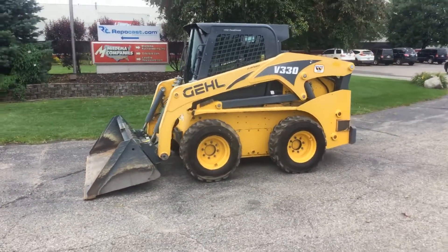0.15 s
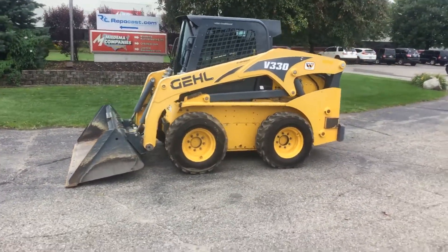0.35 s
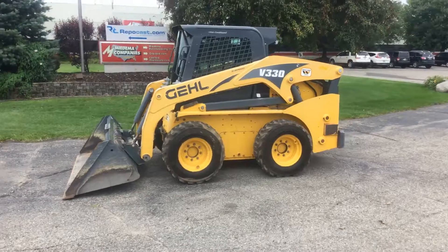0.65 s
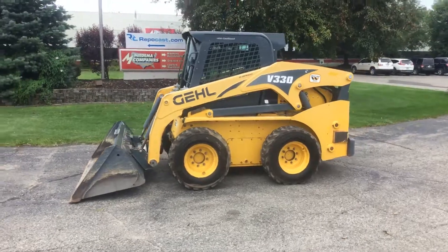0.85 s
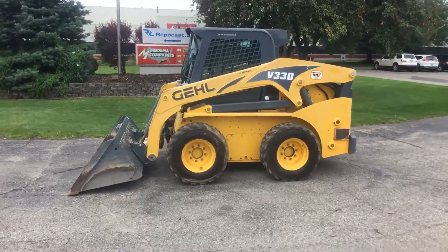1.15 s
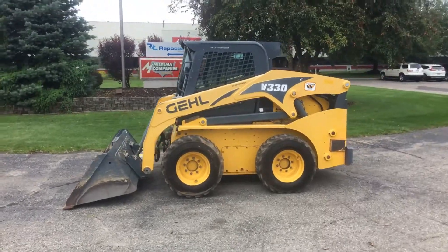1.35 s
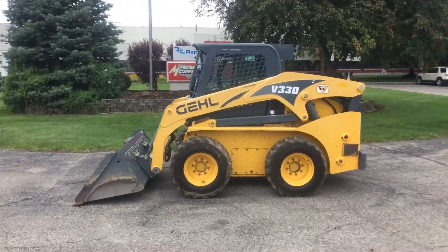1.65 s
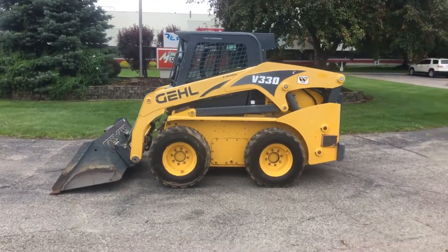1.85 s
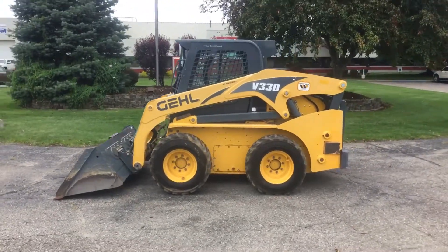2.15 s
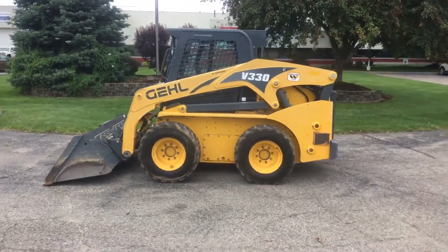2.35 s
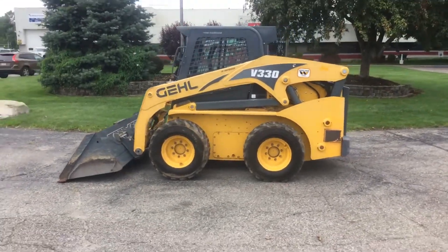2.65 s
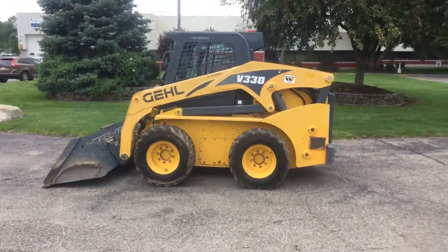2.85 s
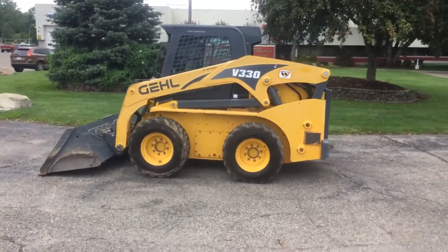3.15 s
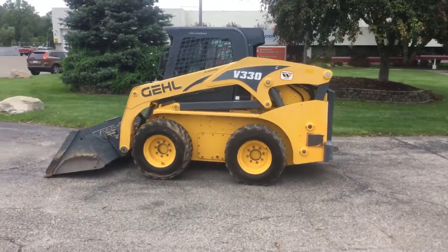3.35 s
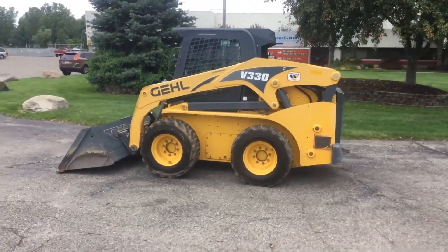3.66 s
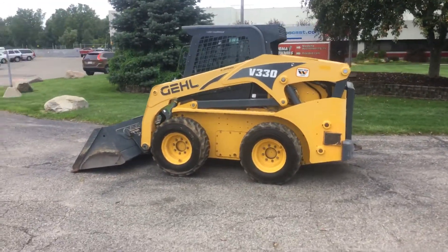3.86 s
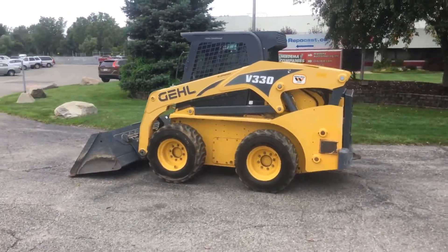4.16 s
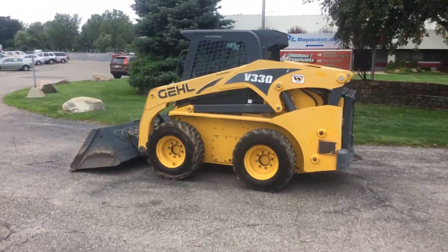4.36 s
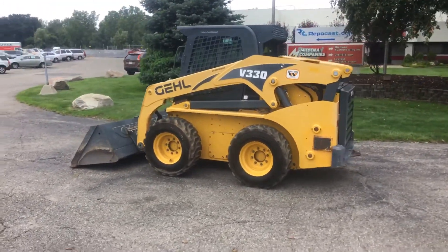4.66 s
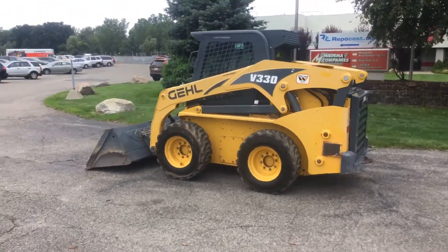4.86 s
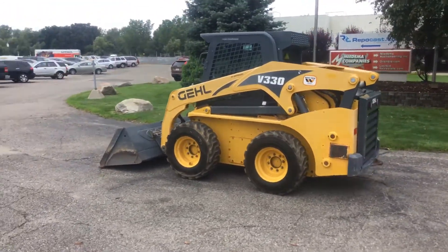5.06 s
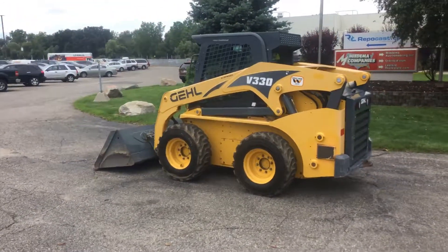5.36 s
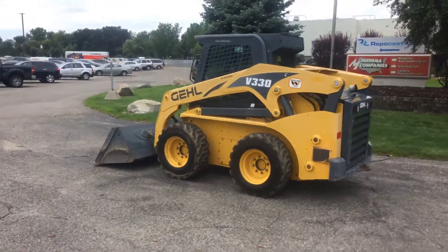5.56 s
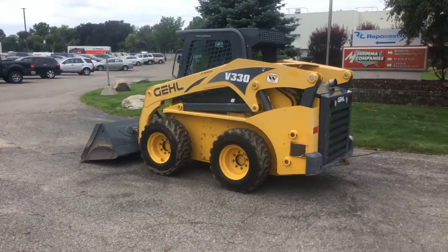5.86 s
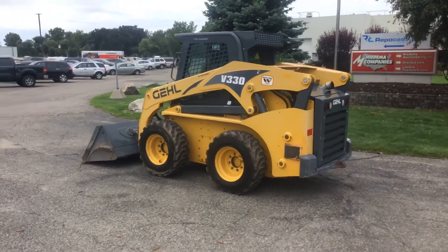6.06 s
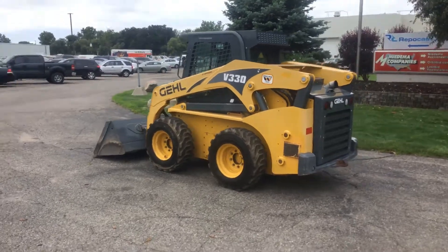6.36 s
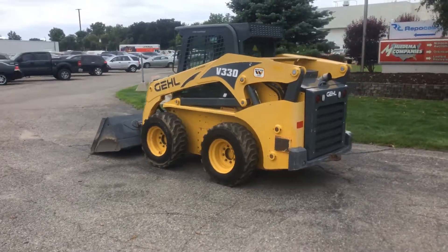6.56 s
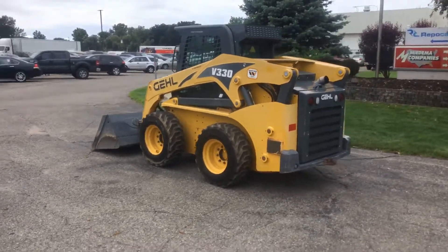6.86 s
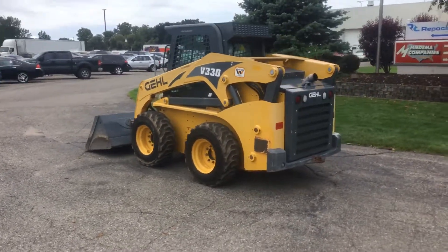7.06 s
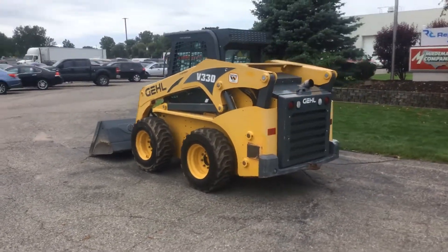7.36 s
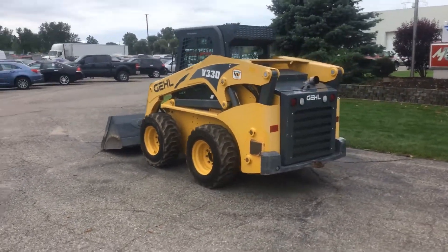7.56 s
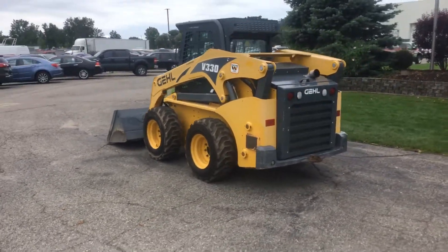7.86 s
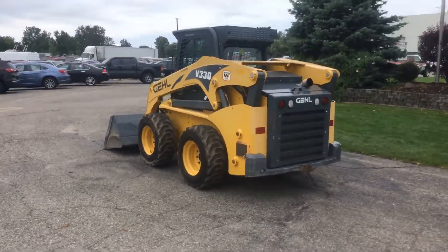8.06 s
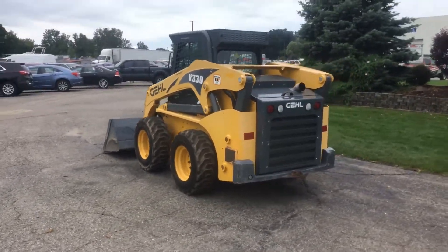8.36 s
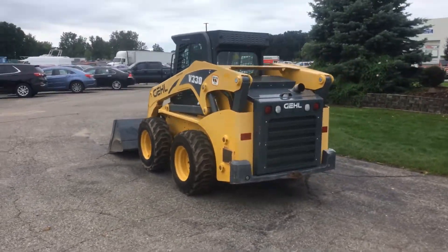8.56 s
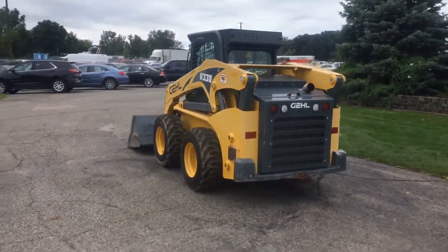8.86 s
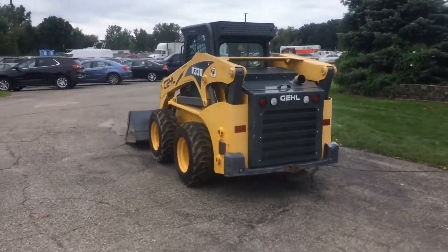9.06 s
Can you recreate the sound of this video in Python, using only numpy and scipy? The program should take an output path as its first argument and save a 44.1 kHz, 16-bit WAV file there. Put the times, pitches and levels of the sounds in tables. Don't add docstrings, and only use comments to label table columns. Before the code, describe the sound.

Mono handheld pickup of a parked skid steer with its four-cylinder diesel running steadily. Low hum and exhaust rumble carry a rattling, tapping engine block. A small click comes early, then a burst of heavy thuds and a clipped crack. Walking round to the radiator end brings brighter clatter, airy fan noise and faint whine, with later bumps and plastic ticks.

```python
import sys
import numpy as np
from scipy import signal
from scipy.fft import rfft, irfft, next_fast_len
from scipy.io import wavfile
from scipy.ndimage import uniform_filter1d, map_coordinates

SR = 44100
rng = np.random.default_rng(int(sys.argv[2]) if len(sys.argv) > 2 else 0)


def unload_wav(signal):
    wavfile.write(
        sys.argv[1],
        SR,
        np.round(np.clip(np.atleast_2d(signal).T, -1, 1) * 32767).astype(np.int16),
    )


def convert_level_to_amplitude(level_db):
    exponent = np.asarray(level_db, float) / 20
    return 10 ** exponent


N = 405719

CYCLE_HZ = 12.70
DRONE_ORDERS = [4, 8, 12, 20]
BLOCK_ORDERS = [40, 44, 46, 50, 52, 56, 60, 66, 71, 80, 81, 88, 92, 108]


def unit(x):
    return x / np.sqrt(np.mean(x ** 2) + 1e-20)


def wobble(rate_hz):
    fine = np.arange(0, N + 24, 24)
    knots = rng.standard_normal(int(N * rate_hz / SR) + 4)
    return np.interp(np.arange(N), fine, map_coordinates(knots, [fine * rate_hz / SR]))


def bumps(rows, half_s):
    t = np.arange(N) / SR
    return sum(db * np.exp(-.5 * ((t - s) / half_s) ** 2) for s, db in rows)


def coloured(x, spectrum):
    m = next_fast_len(N + 8192)
    hz, db = np.transpose(spectrum)
    gain = convert_level_to_amplitude(np.interp(np.log(np.fft.rfftfreq(m, 1 / SR) + 1), np.log(hz + 1), db))
    return unit(irfft(rfft(x, m) * gain, m)[:N])


def patchy(x, patchy_db):
    z = signal.stft(x, nperseg=1024)[2]
    field = uniform_filter1d(rng.standard_normal(z.shape), 3, 0)
    field = uniform_filter1d(field, 50, 1)
    return signal.istft(z * convert_level_to_amplitude(patchy_db * unit(field)), nperseg=1024)[1][:N]


def narrow_whine(hz, width_hz):
    phase = 2 * np.pi * hz * np.arange(N) / SR
    return unit(wobble(width_hz) * np.sin(phase) + wobble(width_hz) * np.cos(phase))


def walk():
    # (time [s], grille facing [0-1], extra path of the ground echo [m])
    way = [(0.0, 0.05, 0.87), (0.6, 0.08, 1.05), (1.1, 0.07, 1.2), (1.6, 0.08, 1.51), (2.3, 0.05, 1.76),
           (2.9, 0.1, 1.79), (3.6, 0.1, 1.83), (4.3, 0.26, 1.82), (5.05, 0.43, 1.65), (5.5, 0.66, 1.85),
           (6.1, 0.67, 1.93), (6.5, 0.87, 2.04), (6.9, 0.95, 2.22), (7.3, 0.93, 2.32), (7.9, 0.99, 2.55),
           (8.6, 1.0, 3), (9.2, 1.0, 3.09)]
    s, turned, path_m = np.transpose(way)
    t = np.arange(N) / SR
    return np.interp(t, s, turned), np.interp(t, s, path_m)


def facing(turned, side_db, rear_db):
    return side_db + (rear_db - side_db) * turned


def echoed(cycles, share):
    return np.sqrt(np.abs(1 + share ** 2 + 2 * share * np.cos(2 * np.pi * cycles)))


def order(turn, k, unsteady_db, drift_rad):
    phase = 2 * np.pi * (k * turn + rng.random()) + drift_rad * wobble(2.506)
    return np.sqrt(2) * convert_level_to_amplitude(unsteady_db * wobble(5.5)) * np.sin(phase)


def gated(turn, depth, sharp, scatter_db):
    firing = 4 * turn
    strength = convert_level_to_amplitude(scatter_db * rng.standard_normal(int(firing[-1]) + 2))[firing.astype(int)]
    swell = np.abs(np.sin(np.pi * firing)) ** sharp
    return (1 + depth * strength * swell) * rng.standard_normal(N)


def same_each_cycle(turn, skip):
    place = np.arange(4096) / 4096
    blows = (1 + .9 * np.sin(4 * np.pi * place) ** 4) * rng.standard_normal(len(place))
    orders = rfft(blows)
    orders[skip] = 0
    pattern = unit(irfft(orders))
    return pattern[(turn % 1 * len(pattern)).astype(int)]


def knocks():
    # (time [s], shell level [dB], thud level [dB], thud life [s])
    blows = [(2.5534, -4, -10.5, 0.015), (2.5632, -14, -32, .008), (2.608, -25, -15, 0.0063),
             (2.7149, 3, 3, 0.0057), (2.872, -20, -23, 0.0099), (3.0057, -7.5, -13.5, 0.008),
             (5.989, -5, -6, 0.0082), (6.446, -20, -22, 0.0093), (6.4912, -28, -26, .006),
             (6.546, -26, -25, .006), (7.9252, -11.5, -13, 0.0048), (8.2082, -19, -18, 0.011),
             (8.2556, -11.5, -10.5, .008), (8.3112, -18, -20, 0.005), (8.336, -24, -29, 0.0068)]
    shell_hz, overtone_hz, overtone_db, thud_hz = 208, 430, -26, 82
    out, lead = np.zeros(N + SR), SR // 50
    t = np.arange(-lead, SR // 8) / SR
    flex = np.cos(2 * np.pi * shell_hz * t) + convert_level_to_amplitude(overtone_db) * np.cos(2 * np.pi * overtone_hz * t)
    half_s = np.where(t < .0002, .0022, .003)
    shell = -flex * np.exp(-.5 * ((t - .0002) / half_s) ** 2)
    for s, shell_db, thud_db, life_s in blows:
        u = np.maximum(t + 0.00153, 0) / life_s
        thud = np.sin(2 * np.pi * thud_hz * (t - .0012)) * u * np.exp(1 - u)
        out[round(s * SR) - lead:][:len(t)] += convert_level_to_amplitude(shell_db) * shell + convert_level_to_amplitude(thud_db) * thud
    return out[:N]


def casing_ticks():
    # (time [s], peak level [dB], centre [Hz])
    taps = [(2.5493, -37, 2000), (2.5512, -17.5, 550), (2.5515, -26, 1000), (2.7193, -6.5, 510),
            (2.718, -23, 1490), (3.0372, -58, 7000), (5.9838, -36, 6500), (7.918, -34, 2500),
            (8.0348, -29.5, 8650), (8.036, -29, 2200), (8.0364, -13.5, 1000), (8.2045, -31, 7160),
            (8.2528, -33, 8000), (8.2535, -21, 1780)]
    # (centre [Hz], level [dB])
    crack = [(14000, -22), (10000, -21), (7000, -22), (4050, -17), (2500, -13.5), (1760, -8.5), (1200, -6),
             (850, -4), (596, -2)]
    crack_s, crack_db, lag_s_per_octave = 2.7086, -10, 0.00058
    bursts = [(s, db, hz, 0.46) for s, db, hz in taps]
    for hz, db in crack:
        late_s = lag_s_per_octave * np.log2(crack[0][0] / hz)
        bursts.append((crack_s + late_s, crack_db + db, hz, 0.65))
    out, lead = np.zeros(N + SR), SR // 200
    t = np.arange(-lead, lead) / SR
    for s, db, hz, shortens in bursts:
        half_s = .00065 * (hz / 1000) ** -shortens
        burst = np.cos(2 * np.pi * hz * t) * np.exp(-.5 * (t / half_s) ** 2)
        out[round(s * SR) - lead:][:len(t)] += convert_level_to_amplitude(db) * burst
    return out[:N]


def handling():
    highpass = signal.butter(2, 30, "high", fs=SR, output="sos")
    return signal.sosfilt(highpass, knocks() + casing_ticks())


def pump():
    return convert_level_to_amplitude(-63 + 0 * N) * np.exp(-.5 * ((np.arange(N) / SR - 1.4) / .8) ** 2) * narrow_whine(2610, 40)


def turbo(turned):
    # (centre [Hz], width [Hz], level [dB])
    whines = [(3936, 60, -5), (4078, 50, -5), (4000, 500, -9), (2488, 50, -11), (2610, 60, -10),
              (4715, 60, -18), (4838, 40, -17)]
    # (time [s], rise [dB])
    glimpses = [
        (.3, 2.8),
        (2.1, 3.7),
        (4.6, 1.7),
        (6.5, 4.1),
        (7.1, 4.6),
        (8.9, 4.6),
    ]
    whine = sum(convert_level_to_amplitude(db) * narrow_whine(hz, width_hz) for hz, width_hz, db in whines)
    whine_db = facing(turned, -66, -52.5) + bumps(glimpses, half_s=0.32) + 1.4 * wobble(2.7)
    return convert_level_to_amplitude(whine_db) * whine


def grille(turn, turned):
    # (frequency [Hz], level [dB per Hz])
    spectrum = [(1060, -15), (1800, -0.5), (1880, -10.5), (2300, -3), (2580, 3), (3150, -7.5), (4020, -3),
                (4400, -5), (4860, -6), (7920, -13), (9150, -13.5), (11800, -17.5), (12900, -18.5),
                (14400, -29), (15600, -26)]
    beat = facing(turned, .3, .14)
    hiss = gated(turn + .025, depth=beat, sharp=4, scatter_db=3)
    hiss = hiss + .35 * same_each_cycle(turn, BLOCK_ORDERS)
    hiss = coloured(patchy(hiss, patchy_db=1.6), spectrum)
    hiss_db = facing(turned, -52.04, -42.54) + 0.5 * wobble(14) + 0.5 * wobble(5.7)
    return convert_level_to_amplitude(hiss_db) * hiss


def valves(turn, rear):
    # (place in the cycle [0-1], ring [Hz], side level [dB], rear level [dB], life [s])
    blows = [
        (.37, 1550, -3, -10, .0025),
        (.87, 1450, -9, -13, .0025),
        (.58, 550, -7, -16, .005),
        (.92, 1170, -8, -12, .006),
        (.08, 1030, -10, -15, .006),
        (.3, 800, -12, -12, .004),
    ]
    out = np.zeros(N)
    for place, hz, side_db, rear_db, life_s in blows:
        since_s = (turn - place) % 1 / CYCLE_HZ
        ring = np.sin(2 * np.pi * hz * since_s) * since_s / life_s * np.exp(1 - since_s / life_s)
        out += convert_level_to_amplitude(facing(rear, side_db, rear_db) + 2 * wobble(2.9) + 1) * ring
    return out


def block_orders(turn, turned):
    # (side level [dB], rear level [dB], echo share, between fades [s], one fade [s])
    lines = [(-55.0, -43.5, 0.54, 6.8, 6.16), (-54.5, -53, 0.71, 3.75, 2), (-51, -47.5, 0.53, 5.46, 1.2),
             (-54.5, -49, 0.5, 4.75, 1.9), (-49.5, -43.5, 0.43, 2.45, 1.4), (-49.5, -38.5, 0.35, 5.5, 1.7),
             (-52, -43.5, 0.64, 2.96, 0.91), (-48, -46, 0.3, 2.04, 0.25), (-52, -44, 0.2, 6, 0.7),
             (-51, -44.5, 0.35, 3.8, 3.3), (-59, -41, 0.32, 2.94, 2.6), (-70, -42.5, 0.2, 5.3, 0.69),
             (-51.5, -47, 0.61, 4.2, 1.64), (-55, -46, 0.45, 2.46, 0.94)]
    t, out = np.arange(N) / SR, np.zeros(N)
    for k, (side_db, rear_db, share, every_s, fade_s) in zip(BLOCK_ORDERS, lines):
        fading = echoed((t - fade_s) / every_s + .5, share)
        out += convert_level_to_amplitude(facing(turned, side_db, rear_db)) * fading * order(turn, k, 1.07, 0.3)
    return out


def block(turn, turned):
    # (frequency [Hz], level [dB per Hz])
    side_spectrum = [(240, -31), (400, -16.5), (503, -8), (650, -3), (779, -6.5), (852, -1.5), (952, -7),
                     (1030, -1), (1510, -9), (1880, -20.5), (2100, -21), (2730, -24.5), (4620, -120)]
    # (frequency [Hz], level [dB per Hz])
    rear_spectrum = [(240, -35), (400, -20.5), (456, -16.5), (558, -7), (707, -5), (773, -5), (959, -2.5),
                     (1040, -3), (1510, -6.5), (1890, -21.5), (2100, -21), (2730, -52), (4620, -120)]
    clatter = gated(turn, depth=.26, sharp=2.4, scatter_db=0.0)
    clatter = patchy(clatter + .8 * same_each_cycle(turn, BLOCK_ORDERS), patchy_db=1.1)
    rear = np.clip((turned - .1) / 0.45, 0, 1)
    panels = (1 - rear) * coloured(clatter, side_spectrum) + rear * coloured(clatter, rear_spectrum)
    block_db = facing(turned, -37.5, -31) + 0.49 * wobble(7.6)
    return convert_level_to_amplitude(block_db) * (panels + valves(turn, rear)) + block_orders(turn, turned)


def drone_orders(turn, turned, path_m):
    # (side level [dB], rear level [dB], echo share, own extra path [m])
    drone = [
        (-35.5, -33.5, .05, .1),
        (-39, -37.5, 0.69, -0.19),
        (-34.5, -35.5, 0.19, .42),
        (-33, -32, 1, -0.0046),
    ]
    sound_m_per_s, out = 343, np.zeros(N)
    for k, (side_db, rear_db, share, own_m) in zip(DRONE_ORDERS, drone):
        late_cycles = k * CYCLE_HZ * (path_m + own_m) / sound_m_per_s
        level = convert_level_to_amplitude(facing(turned, side_db, rear_db)) * echoed(late_cycles, share)
        out += level * order(turn, k, 1.1, 0.22)
    return out


def exhaust(turn, turned, path_m):
    # (order of the cycle, level [dB rms])
    low_orders = [(7, -48), (9, -45), (10, -68), (13, -43.5), (14, -46.5), (16, -41), (18, -55), (24, -78),
                  (26, -59), (29, -59)]
    # (frequency [Hz], level [dB per Hz])
    spectrum = [(15, -37), (25, -20), (57, 4), (102, 4.5), (156, 9), (205, -1.5), (252, 5), (279, -5.5),
                (308, -4.5), (440, -21), (480, -19), (620, -48), (1060, -120)]
    # (time [s], rise over the engine's rumble [dB])
    fumbles = [
        (2.57, 6.3),
        (6.45, 1.9),
        (7.2, 1.8),
        (8.15, 5),
        (9.2, 2.4),
    ]
    drone = drone_orders(turn, turned, path_m)
    drone = drone + sum(convert_level_to_amplitude(db) * order(turn, k, 1.5, 0.16) for k, db in low_orders)
    skip = [k for k, db in low_orders] + list(DRONE_ORDERS)
    flow = rng.standard_normal(N) + 1.1 * same_each_cycle(turn, skip)
    rumble_db = facing(turned, -37, -34) + bumps(fumbles, half_s=0.14) + 0.84 * wobble(14.0)
    return drone + convert_level_to_amplitude(rumble_db) * coloured(flow, spectrum)


def engine():
    turn = np.cumsum(CYCLE_HZ * (1 + .0004 * wobble(1.5))) / SR
    turned, path_m = walk()
    front = pump() + turbo(turned) + grille(turn, turned)
    return front + block(turn, turned) + exhaust(turn, turned, path_m)


def scene():
    return (handling() + engine())[None]


def roll_off(x):
    return signal.sosfilt(signal.butter(12, 16310, fs=SR, output="sos"), x)


def record(dry):
    x = signal.sosfilt(signal.butter(2, 28, "high", fs=SR, output="sos"), dry)
    keep = np.exp(-1 / (.15 * SR))
    loud = signal.lfilter([1 - keep], [1, -keep], np.maximum(x ** 2 - .03, 0))
    late = np.pad(loud, ((0, 0), (SR // 50, 0)))[:, :N]
    x = x * uniform_filter1d(1 / np.sqrt(1 + 14 * late), SR // 40)
    slip_s, slip_db, settling_s = .6033, -18, .0025
    after_s = np.arange(N) / SR - slip_s
    x = x + convert_level_to_amplitude(slip_db) * (after_s > 0) * np.exp(-np.abs(after_s) / settling_s)
    x = x / (1 + np.abs(x) ** 12) ** (1 / 12)
    top_hz, m = 15720, next_fast_len(N)
    x = irfft(rfft(x, m) * (np.fft.rfftfreq(m, 1 / SR) < top_hz), m)[:, :N]
    return roll_off(x)


dry = scene()
out = record(dry)
unload_wav(out)
```